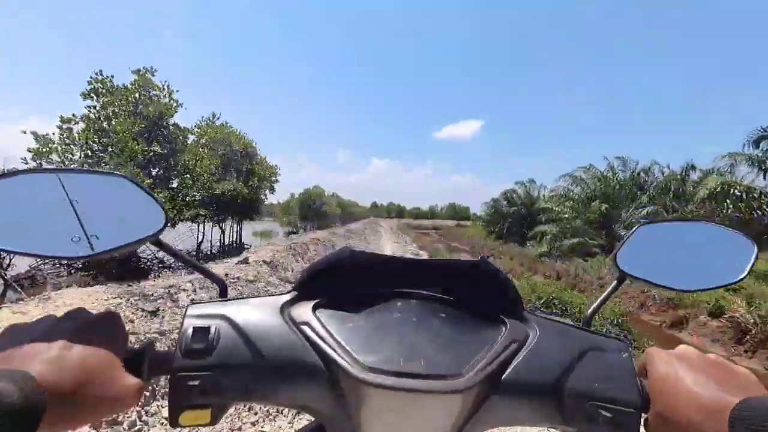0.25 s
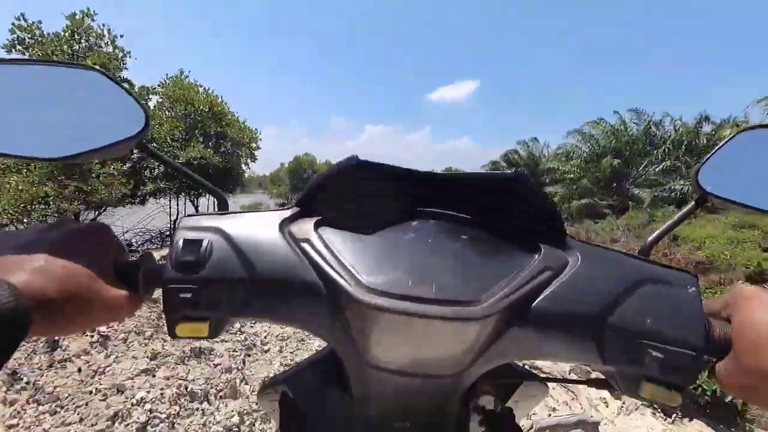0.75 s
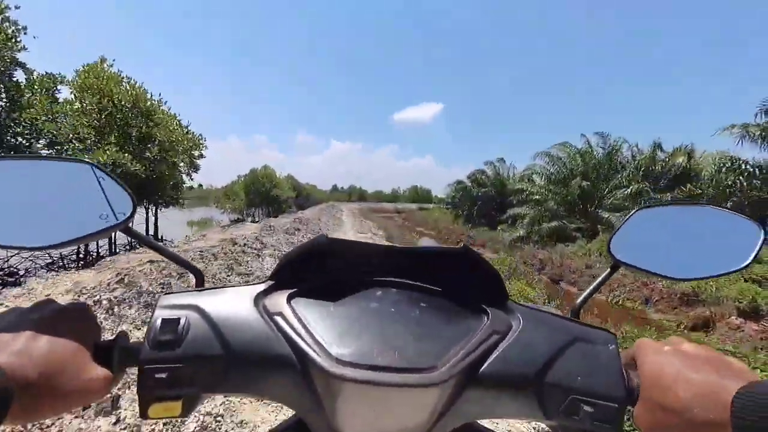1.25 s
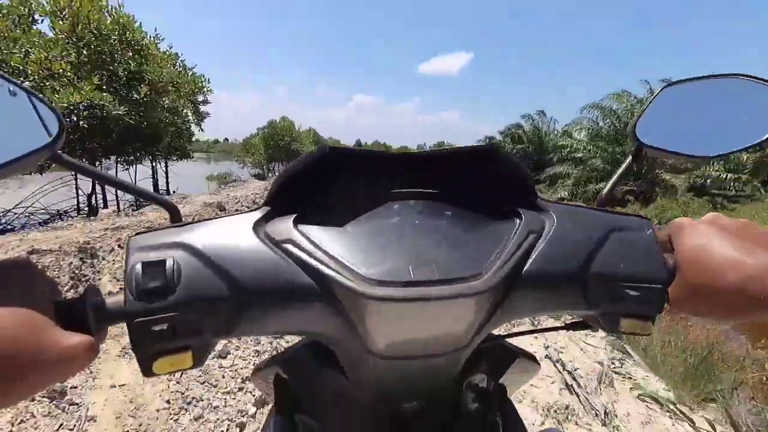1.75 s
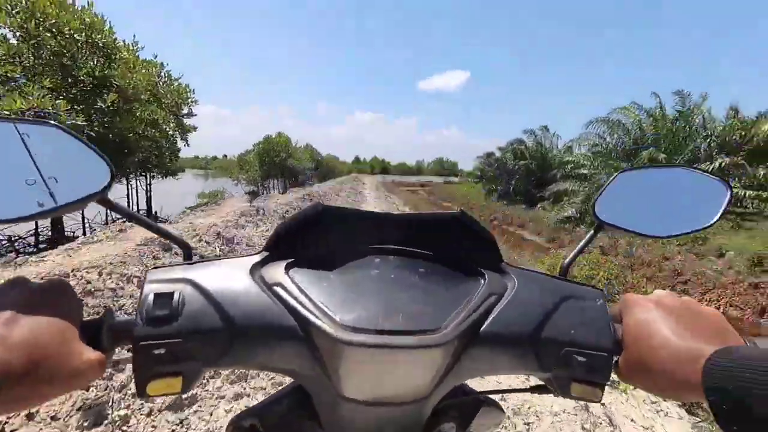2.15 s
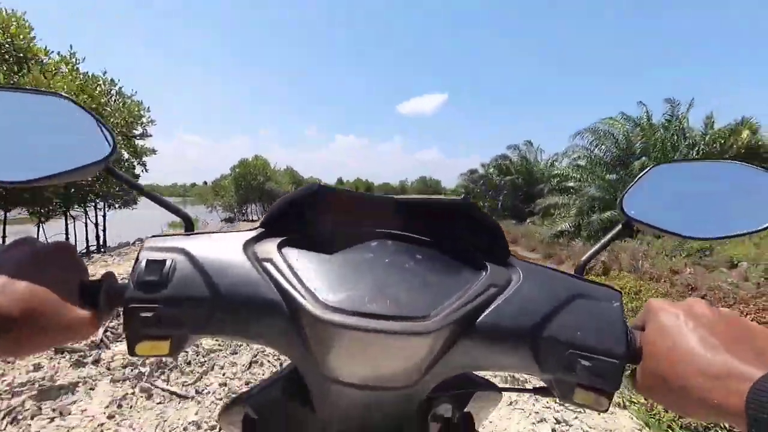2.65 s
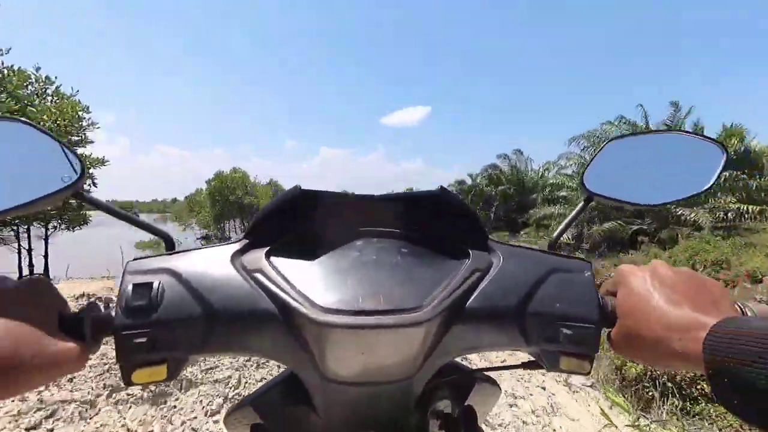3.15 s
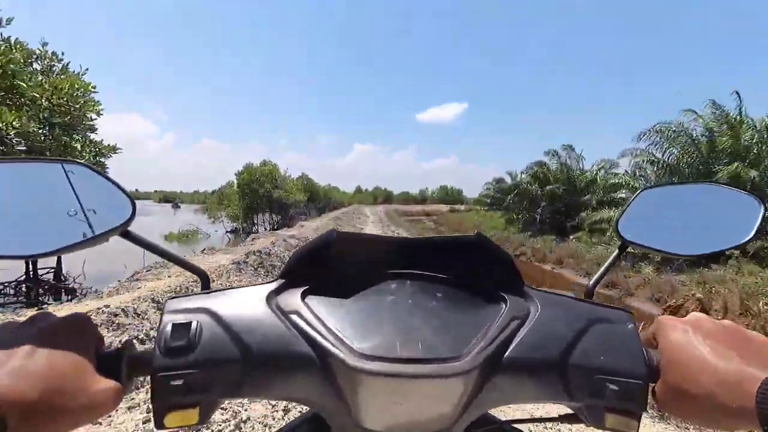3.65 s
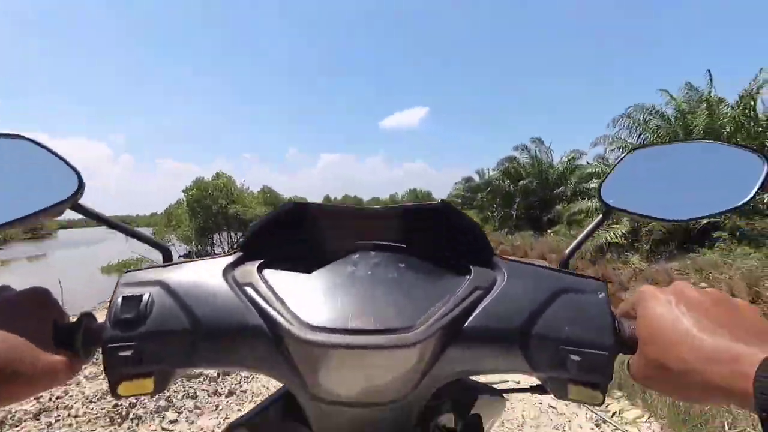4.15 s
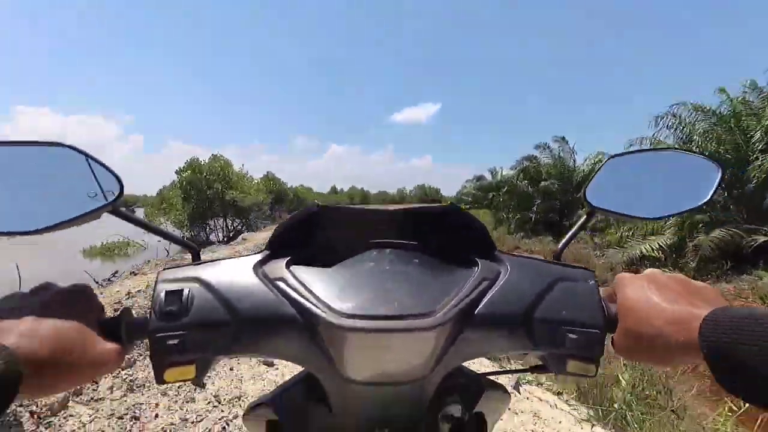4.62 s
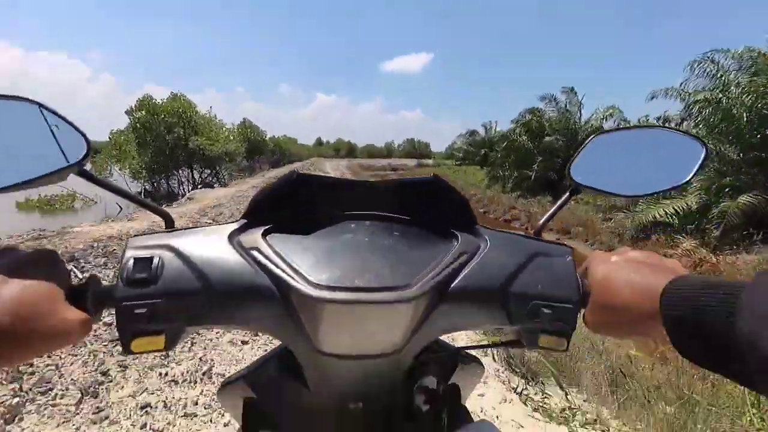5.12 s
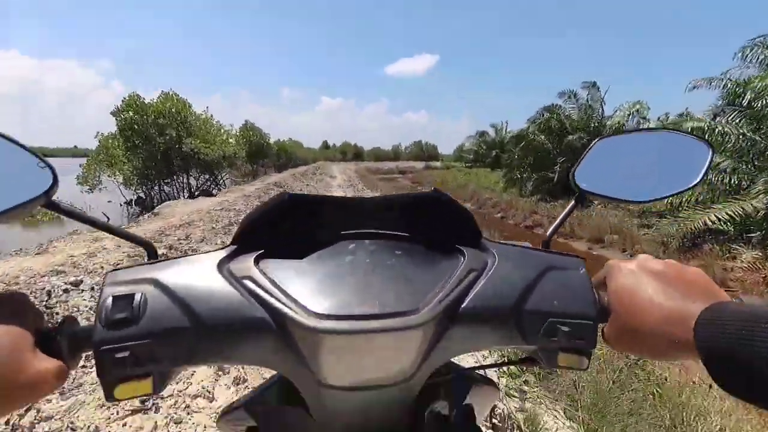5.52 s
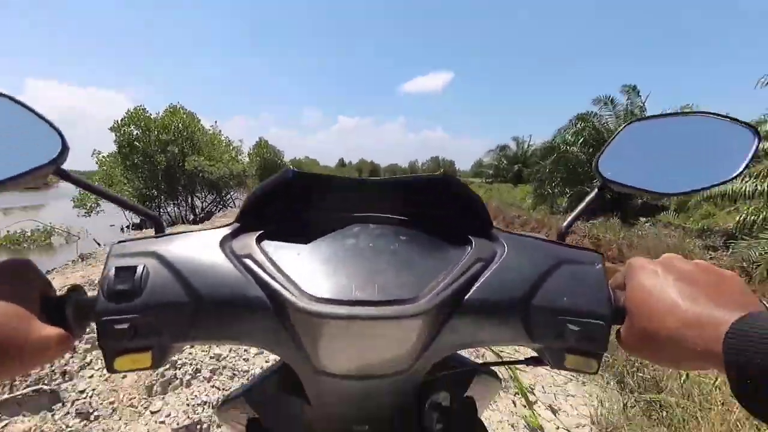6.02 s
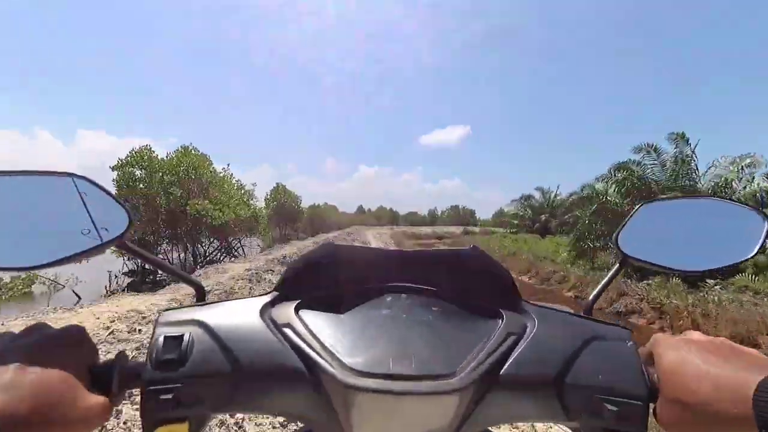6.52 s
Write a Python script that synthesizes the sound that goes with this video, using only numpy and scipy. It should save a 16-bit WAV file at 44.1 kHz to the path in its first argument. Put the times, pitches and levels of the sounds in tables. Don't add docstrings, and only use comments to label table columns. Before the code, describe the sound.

Close from the rider's chest, a single-cylinder scooter throbs slowly over gravel outdoors. Hollow body panels shudder, a loose part chatters rapidly, and jolts and belt slaps knock. The engine eases after a second, picks up again, cruises roughly, dips around five seconds with a hard stone thud, then pulls away. Low wind and tyre wash lie behind. The sound is muffled and left-sided, with only faint hiss on the right.

```python
import sys
import numpy as np
from scipy import signal
from scipy.fft import rfft, irfft, next_fast_len
from scipy.io import wavfile
from scipy.ndimage import uniform_filter1d, minimum_filter1d

SR = 44100
rng = np.random.default_rng(int(sys.argv[2]) if len(sys.argv) > 2 else 0)


def persist_wave(psi):
    counts = np.round(np.clip(psi, -1, 1) * 32767).astype(np.int16)
    wavfile.write(sys.argv[1], SR, np.atleast_2d(counts).T)


def gain_from_db(level_db):
    decades = np.asarray(level_db, float) / 20
    return 10 ** decades


N = 298557

# time_s, firing_rate_hz
ENGINE_SPEED = [(0.0, 18.83), (0.14, 19.77), (0.72, 19.39), (0.86, 20.07), (1.3, 17.92), (1.44, 13.98),
                (1.73, 15.37), (2.16, 13.54), (2.3, 14.57), (2.59, 19.23), (2.88, 20.81), (4.75, 20.75),
                (5.04, 18.96), (5.33, 15.02), (5.91, 17.12), (6.05, 19.35), (6.48, 20.52), (6.77, 13.24)]
# time_s, level_db
THROTTLE = [(0.0, -25.5), (0.64, -26), (1.24, -26), (1.32, -30.5), (1.92, -33.5), (2.17, -34.5),
            (2.28, -31.5), (2.37, -33), (2.49, -29.5), (3.07, -23.5), (3.62, -28), (4.22, -27.5),
            (4.45, -28.5), (4.94, -31), (5.66, -41), (6.09, -24.5), (6.6, -28.5), (6.77, -36)]
# multiple_of_firing_rate, level_db at mean throttle
ORDER_TONES = [(11, -24), (12, -23), (13, -26), (14, -21), (17, -25), (20, -26)]
# share_of_cycle, pitch_hz, width_hz, level_db
CYCLE_KNOCKS = [(.66, 205, 26, -4), (.16, 205, 26, -9), (.60, 160, 30, -20), (.68, 270, 45, 1),
                (.18, 270, 45, -4), (.45, 360, 40, -1), (.90, 360, 40, -6), (.50, 415, 40, -3),
                (.93, 430, 40, -7), (.74, 600, 50, -2), (.19, 600, 50, -5)]
# start_s, length_s, extra_throb (0-1)
PULLS = [
    (2.22, 0.21, 0.15),
    (5.12, 0.076, 0.15),
    (5.4, 0.092, 0.1),
    (5.95, 0.14, 0.06),
]

# pitch_hz, width_hz, level_db, slope_db_per_db of rattle
LOOSE_MODES = [(1380, 390, 0.5, 0.2), (1840, 270, 0.5, 0.13), (2174, 130, -1, 0.25), (2416, 120, 0, 0.5),
               (2957, 73, -9, 0.13), (3590, 350, 2, 0.36), (3910, 280, -2.5, 0.36), (4590, 83, -14.5, 0.12),
               (5900, 1200, -16, -0.5), (7300, 350, -17, 0)]
# start_s, length_s, extra_db
CHATTER = [(0.01, 0.22, 3), (0.325, 0.18, 2.5), (0.545, 0.29, 4.5), (0.9, 0.22, 3), (1.015, 0.34, -1),
           (1.21, 0.123, 7.5), (1.572, 0.078, 7.5), (1.685, 0.049, 7), (2.005, 0.058, 6),
           (2.555, 0.14, 4.5), (2.74, 0.34, 3.5), (2.94, 0.097, 5.5), (3.27, 0.092, 6.5), (3.53, 0.13, 5.5),
           (3.885, 0.12, 4), (4.105, 0.305, 3.5), (4.435, 0.036, 6), (4.55, 0.049, 3.5), (4.6, 0.312, 8),
           (4.935, 0.11, 3.5), (4.935, 0.317, 7.5), (5.17, 0.015, 3), (5.245, 0.337, 5), (5.54, 0.31, 7.5),
           (5.58, 0.056, 5.5), (5.86, 0.33, 6), (6.295, 0.29, 3), (6.3, 0.095, 8), (6.675, 0.17, 5),
           (6.745, 0.026, 7)]
# time_s, peak_db
FIRST_PULL = [(0.0445, -27), (0.0836, -43.5), (0.1875, -30), (0.2498, -33.5), (0.3192, -42.5),
              (0.3354, -24.5), (0.3461, -25.5), (0.402, -36.5), (0.422, -22.5), (0.4668, -30.5),
              (0.4752, -30.5), (0.5164, -30), (0.53, -31.5), (0.583, -32), (0.6308, -26.5), (0.6555, -33.5),
              (0.722, -31), (0.7568, -26.5), (0.812, -30.5), (0.8358, -26.5), (0.9227, -35), (0.9368, -33),
              (1.0104, -38.5), (1.0271, -31.5), (1.0647, -31.5), (1.091, -33.5), (1.1042, -35.5),
              (1.1864, -44), (1.221, -27.5), (1.2476, -27)]
COASTING = [(1.3014, -38), (1.3308, -39), (1.4067, -42.5), (1.5005, -48.5), (1.519, -42), (1.5374, -41),
            (1.584, -38.5), (1.608, -37.5), (1.6268, -29), (1.697, -41), (1.703, -36), (1.749, -48),
            (1.794, -46), (1.866, -47.5)]
CRUISING = [(2.526, -36), (2.571, -28.5), (2.6083, -30.5), (2.6717, -30.5), (2.762, -28), (2.7974, -34.5),
            (2.9326, -28.5), (2.963, -31.5), (3.0275, -36), (3.2204, -32.5), (3.2325, -33), (3.291, -27),
            (3.3405, -33), (3.4655, -28.5), (3.5168, -31), (3.5428, -32.5), (3.5547, -32), (3.5885, -30.5),
            (3.628, -27), (3.7822, -37), (3.853, -31.5), (3.869, -38), (3.896, -31.5), (3.9186, -30.5),
            (3.9406, -29), (3.965, -30), (3.9918, -27.5), (4.014, -28.5), (4.1118, -32.5), (4.1497, -37),
            (4.1602, -30.5), (4.192, -32), (4.2436, -35), (4.2454, -29), (4.315, -34.5), (4.3281, -24),
            (4.3977, -28.5), (4.4474, -33.5), (4.5542, -35.5), (4.568, -35.5), (4.642, -33.5), (4.66, -26),
            (4.6858, -31), (4.7113, -26.5), (4.7355, -28), (4.77, -27), (4.808, -36), (4.8218, -30.5),
            (4.8805, -34.5), (4.946, -37.5), (4.9595, -27.5), (4.984, -33.5), (4.9973, -31.5),
            (5.0372, -37), (5.1002, -31), (5.1565, -46.5)]
LAST_PULL = [(5.5542, -39), (5.5959, -33.5), (5.625, -36.5), (5.6833, -40), (5.776, -39), (5.833, -34.5),
             (5.8944, -40), (5.9228, -38.5), (5.9478, -34), (5.9804, -37), (6.0124, -41.5), (6.037, -38),
             (6.0711, -45.5), (6.109, -25.5), (6.1554, -26), (6.2041, -35), (6.232, -31), (6.313, -29),
             (6.3317, -32), (6.357, -25), (6.429, -27.5), (6.483, -29), (6.5246, -37), (6.547, -32),
             (6.564, -28), (6.5987, -33.5), (6.654, -37), (6.685, -35.5), (6.7277, -38.5), (6.755, -30)]
# time_s, peak_db
COASTING_TICKS = [(1.8656, -44), (1.9286, -43), (2.022, -35.5), (2.0472, -42.5), (2.0619, -40),
                  (2.249, -44.5), (2.374, -39.5), (2.4131, -38), (2.4697, -39.5), (2.5254, -37)]
LATE_TICKS = [(5.1859, -29), (5.2144, -39), (5.2534, -41.5), (5.3776, -32.5), (5.4083, -40),
              (5.4682, -38.5), (5.5026, -36), (5.5396, -37)]

# pitch_hz, width_hz, level_db
FRAME_MODES = [(165, 41, -10), (210, 40, -8), (244.7, 47.5, -1.5), (280.4, 24.2, -2.5), (325, 33, -5)]
PANEL_MODES = [(379.7, 39, 3), (418, 13, -1.5), (443, 50, -2.5), (489.3, 48, 3), (543.7, 20, -3),
               (598, 110, -5.5)]
FAIRING_MODES = [(776, 91, 0.5), (892, 80, -1.5), (972, 100, 0.5), (1056, 55, -9)]
# time_s, level_db about its mean
SHAKE = [(0.0, 2.5), (1.26, 3.5), (1.38, -3), (1.61, 1.5), (1.84, -3), (2.18, -3.5), (2.64, 2.1),
         (3.56, 2.5), (3.79, 0.5), (4.02, 3), (4.13, 1.5), (4.48, 2.5), (5.16, -0.34), (5.28, -3.5),
         (5.39, -1.5), (5.74, -2.5), (6.08, 1.5), (6.77, 2)]
# pitch_hz, mean_level_db, follow_db_per_db of shaking
GROUPS = [
    (250, -20, 0.97),
    (440, -22, 1.58),
    (605, -25, 1.37),
    (900, -29.5, 1.61),
]
# start_s, length_s, extra_db, pitch_hz
RUTS = [(0.0, 0.13, 6, 723), (0.327, 0.15, 6, 690), (0.564, 0.26, 5, 695), (0.765, 0.2, 2.5, 265),
        (1.342, 0.33, 13.5, 319), (1.378, 0.04, 8, 900), (1.528, 0.099, 9.5, 605), (1.669, 0.095, 12, 346),
        (1.813, 0.33, 11, 345), (1.816, 0.14, 7, 760), (2.047, 0.073, 7, 900), (2.15, 0.17, 6, 605),
        (2.536, 0.069, 7.5, 900), (2.56, 0.1, 7.5, 360), (2.796, 0.3, 5, 605), (3.24, 0.2, 6, 440),
        (3.417, 0.17, 6.5, 275), (3.496, 0.45, 3.5, 605), (3.728, 0.34, 5.5, 320), (4.253, 0.28, 9, 316),
        (4.636, 0.35, 8, 350), (4.679, 0.022, 14, 720), (4.926, 0.13, 5, 605), (5.164, 0.055, 7, 250),
        (5.172, 0.023, 13, 900), (5.376, 0.05, 11.5, 605), (5.658, 0.37, 1, 250), (6.081, 0.27, 5, 250),
        (6.108, 0.38, 6.5, 673), (6.687, 0.056, 8.5, 605)]
# time_s, pitch_hz
BELT_RING = [(0.0, 617), (0.5, 600.2), (0.9, 621), (1.3, 605), (1.45, 581), (2.6, 600), (3.0, 598),
             (3.3, 562.5), (3.6, 596), (3.95, 604), (4.35, 632.2), (4.7, 617.4), (5.2, 598), (5.7, 595),
             (6.05, 622), (6.3, 591.7), (6.5, 633.4), (6.77, 600)]
# start_s, length_s, extra_db
WHINES = [
    (.75, 0.3, 5),
    (3.88, 0.13, 3),
    (4.22, 0.47, 6),
    (6.25, 0.23, 6),
]

# time_s, peak_db, pitch_hz
JOLTS = [(0.975, -9, 357), (1.694, -14, 268), (1.798, -13, 600), (2.047, -21, 900), (2.351, -9, 473),
         (2.361, -12.5, 367), (2.403, -9, 202), (2.484, -7.5, 545), (2.528, -9.5, 193), (2.573, -9.5, 185),
         (2.586, -5, 427), (4.693, -4, 400), (5.161, -10.5, 277), (5.18, -4, 297.2), (5.537, -16, 256),
         (5.684, -14, 265), (5.862, -11, 290.2), (5.926, -10, 279.5)]
# time_s, peak_db, pitch_hz
SLAPS = [(0.04, -8, 590), (0.125, -11, 603), (0.27, -8, 560), (0.368, -11, 630), (0.645, -12, 585),
         (0.72, -17, 638), (0.752, -9, 624), (0.898, -14, 730), (0.975, -9, 637), (1.004, -9, 608),
         (1.067, -12, 627), (1.134, -12, 606), (1.187, -15, 603), (1.221, -6.5, 628), (1.513, -20, 581),
         (1.546, -13.5, 514), (1.867, -15, 566), (2.58, -17, 538.6), (2.758, -10, 587), (2.789, -15, 646),
         (3.193, -10, 575), (3.302, -8, 637), (3.374, -7, 527), (3.98, -13, 522), (4.091, -12, 611),
         (4.325, -13, 692), (4.531, -18, 630), (4.694, -16, 635), (4.902, -17, 585), (4.962, -14, 598),
         (5.039, -12, 600), (5.072, -10, 600), (5.18, -9, 600), (5.41, -16, 600), (5.46, -10, 610),
         (5.5, -16, 592), (5.804, -13, 580), (5.864, -15, 537), (6.112, -16, 560), (6.315, -8, 600),
         (6.338, -11, 608), (6.387, -16, 637), (6.44, -16, 630), (6.471, -16, 640), (6.706, -14, 592)]
# time_s, peak_db, pitch_hz
GRAVEL = [(0.3456, -48, 6230), (0.4763, -46, 5260), (0.9353, -45, 6150), (1.2121, -56, 6380),
          (2.617, -38, 5642), (2.9344, -38.5, 5340), (3.5897, -54, 7043), (3.8731, -35, 7200),
          (3.897, -52, 5660), (3.9898, -62, 7200), (5.4535, -37, 6190), (5.6256, -32, 7300),
          (5.896, -35, 6590), (6.0132, -46, 5900), (6.0392, -42, 5260), (6.4331, -42, 7660),
          (6.4857, -51, 5320), (6.6293, -38, 6174)]
# start_s, length_s, pitch_hz, width_hz, level_db
BUZZES = [
    (1.561, 0.07, 585, 50, -15.5),
    (1.562, 0.028, 539.5, 36, -11),
    (2.042, 0.017, 962, 110, -19),
    (5.405, 0.023, 593.8, 30.4, -11.5),
    (5.456, 0.017, 604, 78.6, -17),
]
# time_s, level_db
STONES = [
    (5.179, -17),
    (5.1861, 1.5),
]
# pitch_hz, width_hz, level_db
PAN_MODES = [(288, 90, 7), (600, 100, -24), (803, 36, -9), (1170, 320, -3), (1540, 350, -9.5),
             (1860, 190, -10)]
# start_s, length_s, extra_db over the resting level
GRASS = [
    (4.46, 0.22, 21),
    (5.05, 1.9, 11),
]
# pitch_hz, level_db per Hz
AIR = [(5, -13.5), (20, -10), (60, -6.5), (110, 0.5), (258, -14.5), (441, -26.5), (584, -10.5),
       (716, -32.5), (1020, -24), (1470, -30), (2210, -33), (2710, -53.5), (3680, -32), (9000, -64),
       (11700, -103), (19800, -120)]
# pitch_hz, level_db per Hz
MIC_HISS = [(20, -25), (3000, 2.5), (8000, -6), (11000, -0.5), (15500, -10)]
INPUT_HISS = [(20, -24), (60, -21), (120, -13), (240, 0), (450, -5), (1000, -12), (3000, -12), (15000, -12)]

A_FIRING_S = 0.545
CRUISE_PER_S = 20
THROB, THROB_PER_SLOWING, PANEL_THROB = 0.043, 0.055, 0.87


def exhaust(cycles):
    puff = knocks(cycles + 0.17, spread_db=0.8)
    for hz, width in [(128, 60), (106, 55), (116, 85)]:
        puff = resonance(puff, hz, width)
    return -rms_one(puff)


def thump(cycles):
    puff = knocks(cycles + 0.07, spread_db=0.8)
    deep = resonance(resonance(puff, 74.6, 41), 74.6, 82)
    overtone = resonance(resonance(puff, 161, 42), 161, 84)
    return gain_from_db(0.5) * rms_one(overtone) - rms_one(deep)


def order_tones(cycles):
    turn = 2 * np.pi * cycles + 0.058 * drift(4.0)
    return sum(gain_from_db(db + 2.6 * drift(3.4)) * np.sin(order * (turn + order)) for order, db in ORDER_TONES)


def engine_knocks(cycles):
    out = np.zeros(N)
    for share, hz, width, db in CYCLE_KNOCKS:
        click = knocks(cycles - share, spread_db=4.0)
        out += gain_from_db(db) * resonance(resonance(click, hz, width), hz, 3 * width) / width
    return rms_one(out)


def engine(cycles, speed, throb):
    exhaust_db, = in_time(THROTTLE)
    firings = cycles + 0.0105 * speed - 0.25
    knock_db = 1.1 * (exhaust_db + 26) - 10.5 + 5 * throb - 6
    thump_db = -39.5 - 0.44 * (exhaust_db + 27.0)
    out = gain_from_db(exhaust_db + 5.0) * exhaust(firings) + gain_from_db(knock_db) * engine_knocks(cycles)
    return out + gain_from_db(thump_db) * thump(firings) + gain_from_db(1.2 * (exhaust_db + 24.0)) * order_tones(cycles)


def rattle(cycles):
    level = -56 + 2.91 * in_time(SHAKE)[0] + 0.13 * drift(27)
    level = level + spells(CHATTER, rise_s=0.021, fall_s=0.0088).sum(0)
    contact = knocks(4 * cycles + 0.65 + 0.09 * drift(30), spread_db=2.5)
    decay = np.exp(-1 / (0.002 * SR))
    burst = rms_one(signal.lfilter([1], [1, -2 * decay, decay ** 2], contact)) + 0.6
    out = loose_part(burst, level)
    evened = out / np.sqrt(uniform_filter1d(out ** 2, size=3000))
    return gain_from_db(level + 5.0) * evened + contacts()


def contacts():
    s, db = np.transpose(FIRST_PULL + COASTING + COASTING_TICKS + LATE_TICKS + CRUISING + LAST_PULL)
    contact_s = 0.0022
    hit, decay = np.zeros(N), np.exp(-1 / (contact_s * SR))
    hit[(s * SR).astype(int)] = gain_from_db(db - 3)
    burst = signal.lfilter([np.e / (contact_s * SR)], [1, -2 * decay, decay ** 2], hit + 1e-18)
    return np.std(burst) * rms_one(loose_part(burst, level=-35.5))


def loose_part(burst, level):
    white = rng.standard_normal((2, N))
    out = 0
    for k, (hz, width, db, slope) in enumerate(LOOSE_MODES):
        ring = resonance(resonance(burst * white[k % 2], hz, width), hz, 3 * width)
        out = out + gain_from_db(db + slope * (level + 43.5)) * rms_one(ring)
    return out


def shaken_body(cycles, throb):
    frame_db, panels_db, belt_db, fairing_db = shaking()
    pulse = np.cos(2 * np.pi * (cycles + 0.12))
    frame = gain_from_db(frame_db) * shaken(FRAME_MODES, patchy_db=3.5)
    panels = gain_from_db(panels_db) * shaken(PANEL_MODES, patchy_db=3.0)
    fairing = gain_from_db(fairing_db) * shaken(FAIRING_MODES, patchy_db=3.0)
    cover = gain_from_db(belt_db) * belt_cover() + gear_whine()
    panel_throb = np.clip(throb - (1 - PANEL_THROB) * THROB, 0, 1)
    frame = (1 + np.clip(throb, 0, 1) * pulse) * frame
    return unloading() * (frame + (1 + panel_throb * pulse) * (panels + fairing + cover))


def shaking():
    hz, db, follows = np.transpose(GROUPS)
    reach = 0.29
    near = np.exp(-(np.log(hz[:, None] / np.array(RUTS)[:, 3]) / reach) ** 2)
    return db[:, None] + np.outer(follows, in_time(SHAKE)[0]) + near @ spells(RUTS, rise_s=0.019, fall_s=0.023)


def shaken(modes, patchy_db):
    out = 0
    for hz, width, db in modes:
        ring = resonance(resonance(rng.standard_normal(N), hz, width), hz, 3.32 * width)
        out = out + gain_from_db(db + patchy_db * drift(8.3)) * steadied(ring)
    return rms_one(out)


def belt_cover():
    return narrow(in_time(BELT_RING)[0], width=52.0)


def gear_whine():
    speed, = in_time(ENGINE_SPEED)
    level = -35 + 1.7 * in_time(SHAKE)[0] + spells(WHINES, rise_s=0.038, fall_s=0.085).sum(0)
    level = level + 1.5 * (CRUISE_PER_S - speed)
    return gain_from_db(level) * narrow(34 * np.maximum(speed, 18.5), width=59.0)


def unloading():
    lift_s, lift_db, land_s = 0.014, -3, 0.00082
    s = np.sort(np.transpose(JOLTS + SLAPS)[0])
    corners = (s[:, None] + np.array([-lift_s, -lift_s / 2, 0, land_s])).ravel()
    db = np.tile([0, lift_db, lift_db, 0], len(s))
    order = np.argsort(corners)
    return gain_from_db(np.interp(np.arange(N) / SR, corners[order], db[order]))


def bumps():
    hits = struck(JOLTS, cycles=1.36, gain_db=0.5) + struck(SLAPS, cycles=2.04, gain_db=0.5)
    return hits + struck(GRAVEL, cycles=1.6, gain_db=-8) + stone_hit() + panel_buzz()


def struck(events, cycles, gain_db):
    out = np.zeros(N)
    for s, db, hz in events:
        start = round(s * SR)
        t = np.arange(min(2000, N - start)) / SR
        shape = t * hz / cycles * np.exp(1 - t * hz / cycles)
        out[start:][:len(t)] += gain_from_db(db + gain_db) * shape * np.sin(2 * np.pi * hz * t)
    return out


def stone_hit():
    hit, out = np.zeros(N), np.zeros(N)
    for s, db in STONES:
        hit[round(s * SR)] = gain_from_db(db)
    dull = signal.sosfilt(signal.butter(6, 2000, fs=SR, output="sos"), hit + 1e-18)
    for hz, width, db in PAN_MODES:
        ring = resonance(resonance(dull, hz, width), hz, 4 * width)
        out += gain_from_db(db) * ring * SR / (2 * np.pi * width)
    return out


def panel_buzz():
    t, out = np.arange(N) / SR, np.zeros(N)
    for s, length, hz, width, db in BUZZES:
        swell = np.sin(np.pi * np.clip((t - s) / length, 0, 1))
        turns = np.cumsum(hz + width * 0.2654 * drift(45)) / SR
        out += gain_from_db(db + 3.5 + 3.8 * drift(60)) * swell * np.sin(2 * np.pi * turns)
    return out


def grass():
    band = signal.butter(2, [5200, 8400], "band", fs=SR, output="sos")
    swish = signal.sosfilt(band, rng.standard_normal(N))
    level = -75 + spells(GRASS, rise_s=0.2, fall_s=0.3).sum(0) + 2 * drift(25)
    return gain_from_db(level) * rms_one(swish)


def air_wash():
    panels_db = shaking()[1]
    return gain_from_db(-32 + 0.3 * (panels_db + 16.5) + 1.2 * drift(6)) * coloured(AIR)


def input_hiss():
    return np.array([gain_from_db(-65) * coloured(MIC_HISS), gain_from_db(-67.5) * coloured(INPUT_HISS)])


def rms_one(x):
    return x / np.sqrt(np.mean(x ** 2) + 1e-20)


def in_time(rows):
    s, *columns = np.transpose(rows)
    return [np.interp(np.arange(N) / SR, s, c) for c in columns]


def spells(rows, rise_s, fall_s):
    t, out = np.arange(N) / SR, []
    for s, length, db, *_ in rows:
        top = min(1, (length + fall_s) / (rise_s + fall_s))
        end = s + length + fall_s
        corners = [s, s + top * rise_s, end - top * fall_s, end]
        out.append(np.interp(t, corners, [0, top * db, top * db, 0]))
    return np.array(out)


def drift(rate):
    r = np.exp(-80 * np.pi * rate / SR)
    white = rng.standard_normal(N // 40 + 2002)
    slow = signal.lfilter([1], [1, -2 * r, r * r], white)[2000:]
    return np.interp(np.arange(N) / 40, np.arange(len(slow)), rms_one(slow))


def knocks(cycles, spread_db):
    whole = np.floor(cycles).astype(int)
    chance = np.clip(rng.standard_normal(whole[-1] - whole[0] + 1), -2.2, 1.6)
    return np.diff(whole, prepend=whole[0]) * gain_from_db(spread_db * chance)[whole - whole[0]]


def resonance(x, hz, width):
    r = np.exp(-np.pi * width / SR)
    zeros = np.array([1, 0, -1]) * (1 - r * r) / 2
    return signal.lfilter(zeros, [1, -2 * r * np.cos(2 * np.pi * hz / SR), r * r], x + 1e-18)


def steadied(ring):
    power = uniform_filter1d(ring ** 2, size=round(0.022 * SR)) + 1e-12
    return rms_one(ring * power ** (-0.3 / 2))


def narrow(hz, width):
    low = signal.butter(2, width / 2, fs=SR, output="sos")
    wander = signal.sosfilt(low, rng.standard_normal((2, N)))
    phase = 2 * np.pi * np.cumsum(hz) / SR
    return steadied(wander[0] * np.cos(phase) + wander[1] * np.sin(phase))


def coloured(spectrum):
    hz, db = np.transpose(spectrum)
    size = next_fast_len(N, real=True)
    bins = np.arange(1, size // 2 + 2) * SR / size
    gain = gain_from_db(np.interp(np.log(bins), np.log(hz), db))
    return rms_one(irfft(rfft(rng.standard_normal(N), size) * gain, size)[:N])


def scene():
    speed, = in_time(ENGINE_SPEED)
    turns = np.cumsum(speed) / SR
    cycles = turns - turns[round(A_FIRING_S * SR)]
    throb = THROB + THROB_PER_SLOWING * (CRUISE_PER_S - speed)
    throb = throb + spells(PULLS, rise_s=0.12, fall_s=0.11).sum(0)
    scooter = engine(cycles, speed, throb) + rattle(cycles) + shaken_body(cycles, throb) + bumps()
    cased = signal.sosfilt(signal.butter(4, 8200, fs=SR, output="sos"), scooter)
    return np.array([cased + grass() + air_wash(), np.zeros(N)])


def roll_off(x):
    return signal.sosfilt(signal.butter(12, 15220, fs=SR, output="sos"), x)


def record(dry):
    room_left = np.minimum(1, 0.99 / (np.abs(dry) + 1e-9))
    gain = minimum_filter1d(room_left, size=301)
    gain = uniform_filter1d(uniform_filter1d(gain, size=151), size=151)
    mix = gain * dry + input_hiss()
    return roll_off(mix)


dry = scene()
out = record(dry)
persist_wave(out)
```